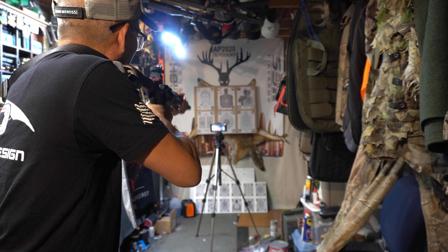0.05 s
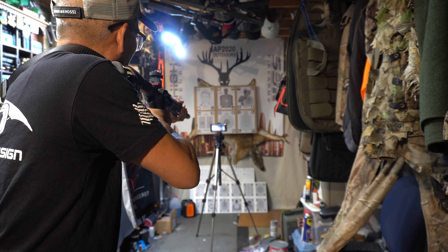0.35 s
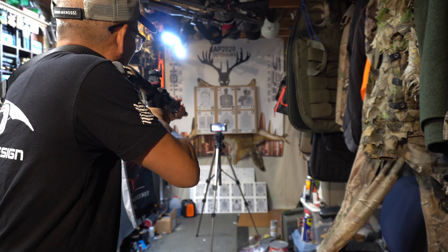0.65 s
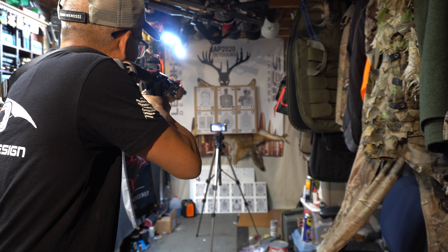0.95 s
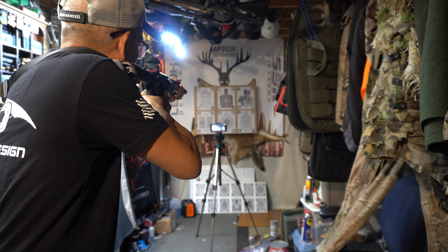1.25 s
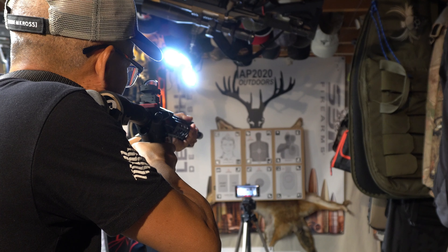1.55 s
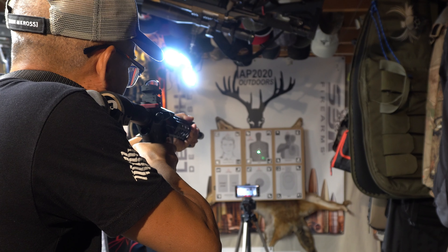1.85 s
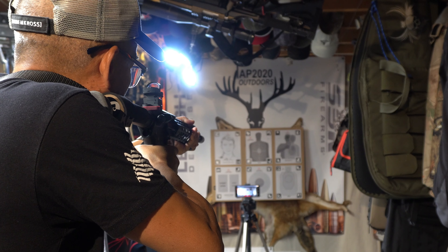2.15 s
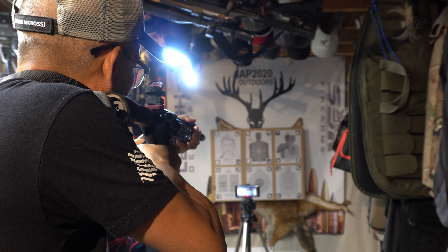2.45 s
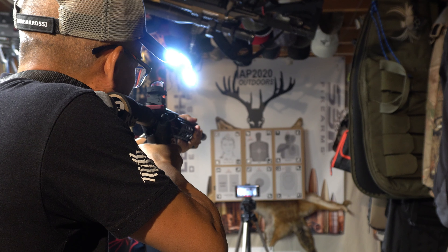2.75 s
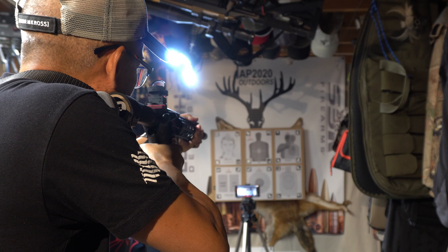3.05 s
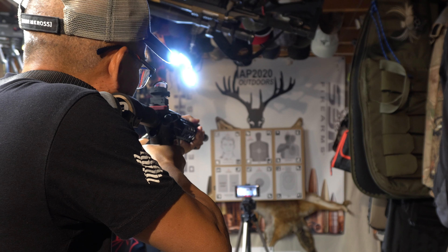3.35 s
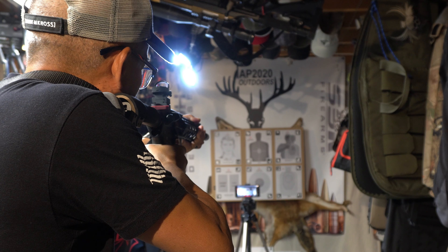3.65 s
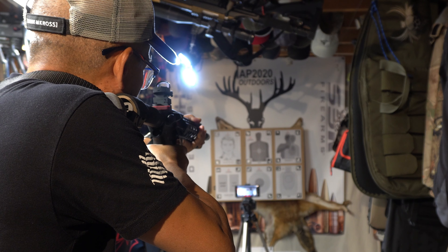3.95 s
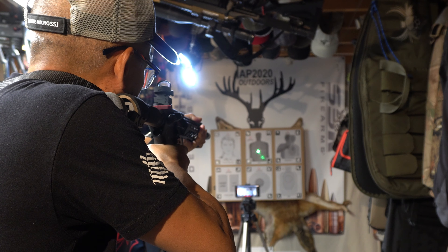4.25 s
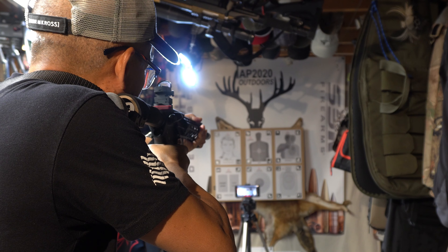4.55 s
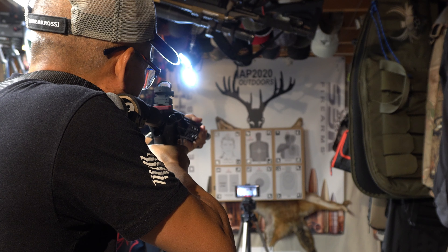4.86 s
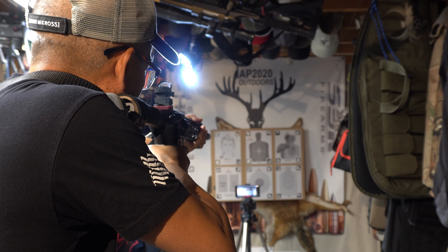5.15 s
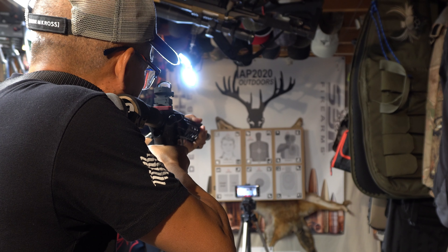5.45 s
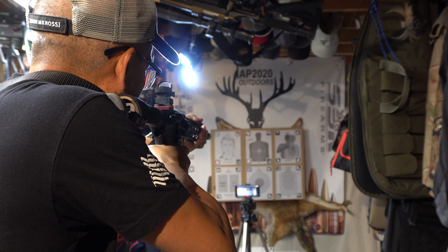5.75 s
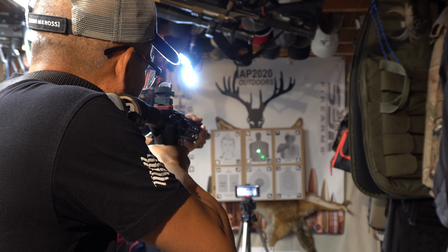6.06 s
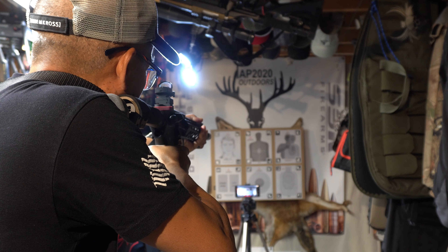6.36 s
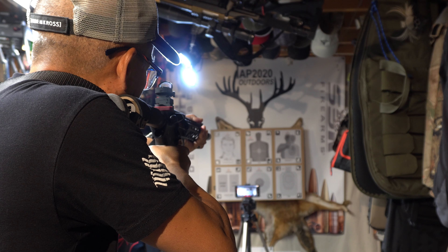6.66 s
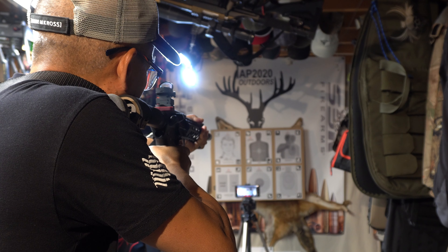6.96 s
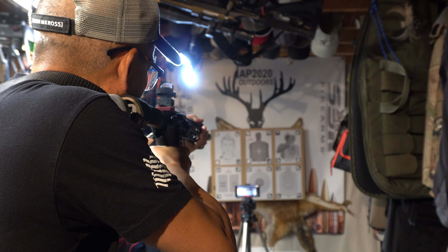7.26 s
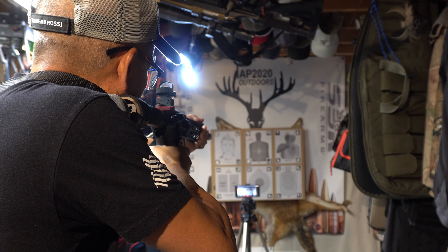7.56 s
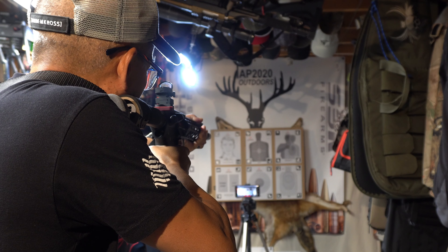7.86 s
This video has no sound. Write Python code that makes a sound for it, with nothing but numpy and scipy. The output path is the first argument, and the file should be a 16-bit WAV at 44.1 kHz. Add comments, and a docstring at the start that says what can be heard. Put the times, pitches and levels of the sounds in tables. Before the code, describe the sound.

Ten close, steely trigger clicks from an unloaded rifle speed up in a small room, each trailed by a brief whir and snaps.

```python
"""A low rumble and faint handling, then ten dry-fire pulls of a rifle in a cluttered basement.
Each pull drops the hammer; a small geared motor whirs, snaps it back over a catch and the sear,
and hits its stop. Every blow is a burst of steel contact that rings the receiver.
Springs and room sing on faintly. The pulls come faster and the rumble grows."""
import sys
import numpy as np
from scipy import signal
from scipy.fft import rfft, irfft
from scipy.io import wavfile
from scipy.ndimage import uniform_filter1d

SR = 44100
rng = np.random.default_rng(int(sys.argv[2]) if len(sys.argv) > 2 else 0)


def generate_wav(sig):
    """Save sig (samples, or channels by samples) to the path in sys.argv[1] as 16-bit PCM at SR."""
    pcm = np.round(np.clip(np.atleast_2d(sig).T, -1, 1) * 32767).astype(np.int16)
    wavfile.write(sys.argv[1], SR, pcm)


N = 357474
TIME_S = np.arange(N) / SR
SIDE_SIGN = np.array([[1], [-1]])

# Background spectra. Each row: frequency in Hz, relative level in dB.
RUMBLE_TONE = [(15, -1.5), (30, 0), (55, -1), (90, -7.5), (150, -17.5), (300, -24), (700, -32.5),
               (2000, -46), (16000, -77.5)]
HISS_TONE = [(50, 2), (400, 8), (1000, -0.5), (2500, -2), (6000, -2), (10000, 0.5), (16000, 1)]
# Background envelopes. Each row: time in seconds, level in dB.
RUMBLE_LEVEL = [(0, -58), (2.1, -55.5), (3.6, -56.5), (4.3, -50.5), (8.11, -52)]
HISS_LEVEL = [(0, -70.5), (4, -66), (8.11, -65.5)]
# Hand bumps. Each row: start in seconds, relative level in dB, hardness in dB, decay in seconds.
BUMPS = [(0.048, -38, -16, 0.0067), (0.731, -33.5, -20, 0.0093), (0.846, -28, -8.5, 0.013),
         (1.726, -46, -10, 0.018), (2.622, -40, -35, 0.093), (7.273, -33.5, -24, 0.02),
         (7.913, -35.5, -34, 0.027)]
# Sleeve rubs. Each row: peak time in seconds, level in dB, rise and fall in seconds, brightness in dB.
SLEEVE_RUBS = [(.18, -65.5, 0.074, 0.033, 3), (.79, -57, 0.05, 0.068, 2), (4.62, -56, 0.2, .12, -10),
               (7.3, -51, 0.23, 0.44, -27.5), (8.1, -52.5, 0.09, 0.079, -25)]
# Grip and trigger ticks. Each row: start in seconds, relative level in dB, pitch in Hz,
# rise in seconds, pitch prominence in dB.
TICKS = [(0.798, -50, 2120, 0.0025, 3), (0.984, -56, 2270, 0.011, 12), (1, -61, 4030, 0.0051, 16),
         (2.672, -62, 3900, 0.0091, 7), (2.869, -64.5, 3340, .006, 0), (3.025, -63.5, 3700, .008, 5.5),
         (3.144, -64.5, 3740, 0.0076, 6), (4.019, -57.5, 3860, 0.0062, 5.5)]
# Trigger pulls. Each row: hammer fall in seconds, its level in dB, delays to sear and to stop
# in seconds, catch level in dB, catch brightness in dB.
PULLS = [(1.8253, -6.3, .085, .1402, -24.5, -1.5), (3.2129, -4, .0937, .1263, -11.5, -3.5),
         (4.257, -3.3, .0867, .1111, -14.5, -3.5), (4.9222, -3, .0876, .1992, -15, -5.5),
         (5.561, -3.3, .0997, .1585, -8.5, 0), (6.0769, -3, .0895, .1265, -10, -2),
         (6.4426, -5.5, .0925, .129, -12, -2.5), (6.837, -4, .0868, .1334, -9, 6),
         (7.3708, -4.5, .0896, .1338, -7, 1), (7.6685, -4.5, .0828, .1388, -10.5, 2)]
# Source spectra. Each row: frequency in Hz, relative level in dB.
BUMP_TONE = [(30, -1.5), (90, -2), (170, -2), (280, 1.5), (500, -20.5), (1500, -20), (3000, -36.5),
             (15000, -43.5)]
SLEEVE_TONE = [(100, 9.5), (500, 4.5), (1400, 0), (2500, -9.5), (4200, -12.5), (6000, -8.5), (8000, -16.5),
               (10500, -16.5), (11500, -14.5), (12500, -13.5), (13500, -19), (16000, -21)]
HAMMER_TONE = [(60, -5.5), (170, -14.5), (500, -15.5), (800, -11.5), (1300, -0.5), (2000, -6), (2800, -5),
               (5000, -10), (6500, -7), (8200, -15.5), (11000, -7.5), (13500, -12), (16000, -22)]
GEAR_TONE = [(40, -4), (90, 1.5), (180, -19.5), (500, -9.5), (1000, -3), (1500, 5), (2500, -8), (4500, -14),
             (9500, -9), (12000, -15.5), (16000, -20)]
CATCH_TONE = [(60, -0.5), (170, -19.5), (500, -15.5), (800, -5.5), (1300, -9), (2000, -2.5), (2800, 0),
              (5000, -12), (6500, -1), (8200, -2.5), (11000, -7.5), (13500, -10.5), (16000, -13.5)]
SEAR_TONE = [(60, -3.5), (170, -23.5), (500, -5), (800, -12.5), (1300, 1.5), (2000, 2.5), (2800, 2.3),
             (5000, -13.5), (6500, -3.5), (8200, -1), (11000, -9.5), (13500, -4), (16000, -11.5)]
STOP_TONE = [(60, -5), (170, -22.5), (500, -13), (800, -10), (1300, -1), (2000, -1), (2800, 1.5),
             (5000, -6), (6500, -3), (8200, -5.5), (11000, -7.5), (13500, -9.5), (16000, -18.5)]
SPRING_WASH_TONE = [(100, -2.5), (500, -0.5), (900, 7.5), (1800, -4.5), (3500, -1.5), (5200, -7.5),
                    (7500, -17.5), (10400, -10.5), (11500, -23), (16000, -34)]
ROOM_TONE = [(100, -0.5), (300, -0.5), (900, -3), (1600, -6.5), (3000, -3.5), (5500, 1), (8000, -6),
             (12000, 1.5), (16000, 12)]
# Receiver resonances. Each row: frequency in Hz, width in Hz, boost in dB.
RECEIVER_PEAKS = [(272, 130, 10), (707, 234, 10.5), (934, 61, 4.5), (1121, 140, 5), (1250, 200, 6),
                  (1400, 240, 1), (1726, 100, 5), (2175, 150, 3), (2612, 280, 6), (3165, 41, 5),
                  (3760, 400, 3.5), (4540, 300, 4.5), (5570, 600, 0.5), (7616, 1200, 10), (8520, 520, 10),
                  (9470, 460, 5), (10200, 540, 6), (12400, 810, 1.5)]
# Ringing parts. Each row: frequency in Hz, relative level in dB, T60 in seconds.
STEEL_MODES = [(1260, -5, 0.069), (1487, 0, 0.22), (1676, 1.5, 0.17), (2150, -7, 0.25), (2570, -2, 0.15),
               (2580, -4, 0.06), (3020, -1.5, 0.071), (3080, -3, 0.13), (3260, -3.5, 0.2),
               (3900, -1.5, 0.11), (4500, -5.5, 0.083), (5070, -4, 0.16), (7700, 1, 0.052),
               (9150, -1, 0.057), (8360, -0.5, 0.05), (9808, -6, .1)]
SPRING_MODES = [(764, -2.5, 0.59), (748, -2.5, 0.23), (785, -13, 0.34), (1230, -8.5, 0.66),
                (1470, -16.5, 1), (2100, -16, 0.82), (2640, -29.5, 0.46), (3430, -16, 0.74),
                (3320, -12, 0.55), (3480, -18, 0.6), (4000, -12.5, 0.33), (10250, -22.5, .28),
                (10480, -17, 0.24), (11000, -22, 0.38)]
# Gear whine. Each row: time after the hammer in seconds, pitch in Hz.
WHINE_PITCH = [(0, 5635), (.02, 7890), (.036, 9270), (.053, 9380), (.075, 9000), (.14, 8326)]
# Gears taking load. Each row: time before the sear in seconds, relative level in dB.
GEAR_KNOCKS = [(.0582, -20), (.0354, -21.5)]
# Gear slips. Each row: time in seconds, relative level in dB, brightness in dB.
GEAR_SLIPS = [(5.0114, -8.5, -1.5), (5.095, -7.5, -1.5)]
# Room decay. Each row: frequency in Hz, T60 in seconds.
ROOM_T60 = [(100, 0.043), (800, 0.28), (2000, 0.26), (5000, 0.27), (9000, 0.21), (16000, .13)]
# Stereo width of room and microphone ports. Each row: frequency in Hz, side over mid in dB.
ROOM_SIDE = [(40, -12), (150, 0), (400, -1.5), (1200, 6), (3000, 1.5), (7000, -0.5), (11000, -3),
             (16000, -14)]
PORT_SIDE = [(50, -16.5), (150, -7), (350, -15), (700, -18), (1300, -18), (2800, -21.5), (5500, -22),
             (10000, -22), (16000, -17)]


def amp(db):
    """Decibels to gain."""
    return 10 ** (np.asarray(db) / 20)


def unit(x):
    """Scale to rms 1."""
    return x / np.sqrt(np.mean(x ** 2) + 1e-20)


def curve_at(points, hz):
    """Interpolate over log frequency."""
    point_hz, value = np.transpose(points)
    return np.interp(np.log(hz + 1), np.log(point_hz + 1), value)


def add(mix, start_s, sound):
    """Mix a sound in place."""
    part = mix[..., max(round(start_s * SR), 0):][..., :sound.shape[-1]]
    part += sound[..., :part.shape[-1]]


def noise(tone, size=N):
    """Coloured noise, rms 1."""
    gain = amp(curve_at(tone, np.fft.rfftfreq(size, 1 / SR)))
    return unit(irfft(rfft(rng.standard_normal(size)) * gain, size))


def stereo_noise(tone, side):
    """Mid noise plus independent side noise."""
    return noise(tone) + side * noise(tone) * SIDE_SIGN


def background():
    """Rumble and hiss, louder in the second half."""
    rumble_db = np.interp(TIME_S, *np.transpose(RUMBLE_LEVEL))
    hiss_db = np.interp(TIME_S, *np.transpose(HISS_LEVEL))
    rumble = amp(rumble_db) * stereo_noise(RUMBLE_TONE, side=.08)
    return rumble + amp(hiss_db) * stereo_noise(HISS_TONE, side=.25)


def bumps(gain_db=-4, hard_above_hz=150, rise_s=.00023):
    """Hands bump the stock; hard bumps reach higher."""
    out, t = np.zeros(N), np.arange(8192) / SR
    for start_s, db, hard_db, decay_s in BUMPS:
        tone = [(hz, tone_db + hard_db * (hz > hard_above_hz)) for hz, tone_db in BUMP_TONE]
        envelope = np.exp(-t / decay_s) * (1 - np.exp(-t / rise_s))
        add(out, start_s, amp(db + gain_db) * noise(tone, len(t)) * envelope)
    return out


def sleeve(cloth_hz=600):
    """A sleeve rubs the stock in swells; slow rubs have little above cloth_hz."""
    out = np.zeros(N)
    for peak_s, db, rise_s, fall_s, bright_db in SLEEVE_RUBS:
        tone = [(hz, tone_db + bright_db * (hz > cloth_hz)) for hz, tone_db in SLEEVE_TONE]
        width_s = np.where(TIME_S < peak_s, rise_s, fall_s)
        out += amp(db) * noise(tone) * np.exp(-((TIME_S - peak_s) / width_s) ** 2)
    return out


def grip_ticks(gain_db=-5):
    """Grip and trigger slack tick as the shooter settles."""
    out, t = np.zeros(N), np.arange(8192) / SR
    for start_s, db, hz, rise_s, peak_db in TICKS:
        tone = [(hz / 4, -16), (hz * .85, 0), (hz, peak_db), (hz * 1.15, 0), (hz * 2.6, -18)]
        envelope = t / rise_s * np.exp(1 - t / rise_s)
        add(out, start_s, amp(db + gain_db) * noise(tone, len(t)) * envelope)
    return out


def contact(rise_s, fall_s, chatter_db, chatter_s, crisp_s=.0025, soft_hz=7000, size=1024):
    """Steel on steel: a burst builds, collapses and chatters; only its peak keeps the top treble."""
    t = (np.arange(size) - size // 4) / SR
    decay = np.exp(-abs(t) / fall_s) + amp(chatter_db) * np.exp(-abs(t) / chatter_s)
    envelope = np.where(t < 0, np.exp(-abs(t) / rise_s), decay)
    burst = rng.standard_normal(size) * envelope
    for _ in range(2):  # hard contact: near-flat spectrum
        flat = irfft(np.exp(1j * np.angle(rfft(burst))))
        burst = envelope * np.tanh(unit(flat) / (unit(envelope) + 1e-9))
    hz = np.fft.rfftfreq(size, 1 / SR)
    soft = irfft(rfft(burst) / np.sqrt(1 + (hz / soft_hz) ** 2))
    return soft + (burst - soft) * np.exp(-(t / crisp_s) ** 2)


def receiver(tone, bright_db, pivot_hz=3500, vary_db=3, size=4096):
    """Minimum-phase ring of the receiver; each blow favours other resonances."""
    hz = np.fft.rfftfreq(size, 1 / SR)
    db = curve_at(tone, hz) + bright_db * np.tanh(np.log((hz + 1) / pivot_hz))
    for peak_hz, width_hz, boost_db in RECEIVER_PEAKS:
        db += (boost_db + vary_db * rng.standard_normal()) / (1 + (2 * (hz - peak_hz) / width_hz) ** 2)
    log_gain = np.log(amp(np.r_[db, db[-2:0:-1]]))
    return np.fft.ifft(np.exp(np.conj(signal.hilbert(log_gain)))).real


def blows(hits, tone, gain_db, lead_s, **contact_shape):
    """Contacts ring the receiver. Each hit: time in seconds, relative level and brightness in dB."""
    out = np.zeros(N)
    for hit_s, db, bright_db in hits:
        burst = contact(**contact_shape)
        click = signal.fftconvolve(burst, receiver(tone, bright_db))
        click *= np.sqrt(.002 * SR / np.sum(click ** 2))  # energy of 2 ms at rms 1
        peak_s = len(burst) // 4 / SR
        add(out, hit_s - peak_s - lead_s, amp(db + gain_db) * click)
    return out


def hammer():
    """The hammer strikes once per pull."""
    falls = [(pull_s, db, 0) for pull_s, db, *_ in PULLS]
    return blows(falls, HAMMER_TONE, gain_db=0, lead_s=.0006,
                 rise_s=.0009, fall_s=.002, chatter_db=-22, chatter_s=.005)


def stock_thump(gain_db=-21, hollow_hz=275, rise_s=.00062, fall_s=.0017):
    """The hammer kicks the hollow stock: one heavily damped low mode."""
    out, t = np.zeros(N), np.arange(2048) / SR
    envelope = np.exp(-t / fall_s) * (1 - np.exp(-t / rise_s))
    for pull_s, db, *_ in PULLS:
        hz = hollow_hz * (1 + .069 * rng.standard_normal())
        add(out, pull_s - .001, amp(db + gain_db) * np.sin(2 * np.pi * hz * t) * envelope)
    return out


def steel_ring(drive, gain_db=-27):
    """Barrel, spring and pins ring briefly in narrow modes."""
    t = np.arange(SR // 3) / SR
    ring = sum(amp(db - 60 * t / t60_s) * np.sin(2 * np.pi * hz * t) for hz, db, t60_s in STEEL_MODES)
    return amp(gain_db) * signal.oaconvolve(drive, ring / np.linalg.norm(ring))[:N]


def motor(rasp_db=-30, whine_db=-38, slow_gear_db=-41, tooth_db=2, grit_db=3, fade_db_per_s=25):
    """From hammer to stop the gears rasp, pulsing per tooth; their whine climbs, then sags under load."""
    out = np.zeros(N)
    for pull_s, _, _, to_stop_s, *_ in PULLS:
        t = np.arange(0, to_stop_s, 1 / SR)
        hz = np.interp(t, *np.transpose(WHINE_PITCH)) * (1 + .008 * rng.standard_normal())
        jitter = 1 + .04 * rng.standard_normal(len(t))
        phase = 2 * np.pi * np.cumsum(hz * jitter) / SR
        uneven_bite = unit(uniform_filter1d(rng.standard_normal(len(t)), size=60))
        bite_db = tooth_db * np.sin(phase / 36) + grit_db * uneven_bite
        rasp = unit(noise(GEAR_TONE, len(t)) * amp(bite_db))
        whine = amp(whine_db) * np.sin(phase) + amp(slow_gear_db) * np.sin(phase / 4.4)
        envelope = amp(-fade_db_per_s * t) * signal.windows.tukey(len(t), .08)
        add(out, pull_s, (amp(rasp_db) * rasp + whine) * envelope)
    return out


def gear_knocks():
    """The gears knock twice as they take the load; in one reset they also slip and snap."""
    knocks = [(pull_s + to_sear_s - early_s, db, 0)
              for pull_s, _, to_sear_s, *_ in PULLS for early_s, db in GEAR_KNOCKS]
    return blows(knocks + GEAR_SLIPS, STOP_TONE, gain_db=-2.5, lead_s=.0002,
                 rise_s=.00035, fall_s=.00096, chatter_db=-8, chatter_s=.002)


def reset_snaps(catch_lead_s=.0176, sear_bright_db=1.3, stop_bright_db=-2.7):
    """The hammer snaps over catch and sear, the lever hits its stop; the last two rebound once."""
    catches, sears, stops = [], [], []
    for pull_s, _, to_sear_s, to_stop_s, catch_db, catch_bright_db in PULLS:
        catches.append((pull_s + to_sear_s - catch_lead_s, catch_db, catch_bright_db))
        sears.append((pull_s + to_sear_s, 0, sear_bright_db))  # spring-driven: same force every pull
        stops.append((pull_s + to_stop_s, 0, stop_bright_db))
    sear_rebounds = np.add(sears, [.0125, 0, 0])
    stop_rebounds = np.add(stops, [.0036, 0, -1])
    out = blows(catches, CATCH_TONE, gain_db=0, lead_s=.0002,
                rise_s=.0004, fall_s=.0008, chatter_db=-20, chatter_s=.002)
    out += blows(sears, SEAR_TONE, gain_db=-8.2, lead_s=.0003,
                 rise_s=.00025, fall_s=.0009, chatter_db=-24, chatter_s=.002)
    out += blows(stops, STOP_TONE, gain_db=-5.4, lead_s=.0005,
                 rise_s=.00071, fall_s=.0016, chatter_db=-20.5, chatter_s=.0026)
    out += blows(sear_rebounds, STOP_TONE, gain_db=-23, lead_s=.00012,
                 rise_s=.00013, fall_s=.0038, chatter_db=-25, chatter_s=.0047)
    out += blows(stop_rebounds, STOP_TONE, gain_db=-12.9, lead_s=.0002,
                 rise_s=.000096, fall_s=.0009, chatter_db=-20, chatter_s=.004)
    return out


def springs(delay_s=.272, swell_s=.043, gain_db=-48, wash_db=-2, wash_t60_s=.91, waver_hz=14, waver_db=4):
    """A faint metallic ring over a noise wash swells after each cycle; its modes waver as they die."""
    out, wash_power = np.zeros((2, N)), np.zeros(N)
    t = np.arange(-SR // 4, SR) / SR
    swell = amp(gain_db) * np.exp(-(np.minimum(t, 0) / swell_s) ** 2)
    age_s = np.maximum(t, 0)
    waver_steps = (t - t[0]) * waver_hz
    for pull_s, *_ in PULLS:
        start_s = pull_s + delay_s + t[0]
        for hz, db, t60_s in SPRING_MODES:
            drift_rad = np.interp(waver_steps, np.arange(64), rng.standard_normal(64))
            drift_db = waver_db * np.interp(waver_steps, np.arange(64), rng.standard_normal(64))
            phase = 2 * np.pi * (hz * t + rng.random()) + drift_rad + .5 * rng.standard_normal((2, 1))
            add(out, start_s, amp(db + drift_db - 60 * age_s / t60_s) * swell * np.sin(phase))
        add(wash_power, start_s, (swell * amp(wash_db - 60 * age_s / wash_t60_s)) ** 2)
    return out + np.sqrt(wash_power) * stereo_noise(SPRING_WASH_TONE, side=.43)


def room(source, wet_db=-4.5, onset_s=.0051):
    """Dense reflections from near walls and clutter; each band has its own decay."""
    hz, t, bands = signal.stft(rng.standard_normal((2, SR // 2)), SR, nperseg=256)
    bands *= amp(curve_at(ROOM_TONE, hz)[:, None] - 60 * t / curve_at(ROOM_T60, hz)[:, None])
    bands[1] *= amp(curve_at(ROOM_SIDE, hz))[:, None]
    tail = signal.istft(bands, SR, nperseg=256)[1]
    tail *= 1 - np.exp(-(np.arange(tail.shape[1]) / SR / onset_s) ** 2)
    mid, side = signal.fftconvolve(source[None], tail / np.linalg.norm(tail[0]), axes=1)[:, :N]
    return amp(wet_db) * (mid + side * SIDE_SIGN)


def mic_ports(source, scatter_s=.0006, left_db=.23, size=1024):
    """Scatter off the shoulder reaches two microphone ports with different phases."""
    scatter = rfft(rng.standard_normal(size) * np.exp(-np.arange(size) / SR / scatter_s))
    quarter_turn = 1j * np.tanh(3 * np.sin(np.angle(scatter)))  # keeps both ports equally loud
    side_gain = amp(curve_at(PORT_SIDE, np.fft.rfftfreq(size, 1 / SR)))
    kernel = np.roll(irfft(quarter_turn * side_gain), size // 2)
    side = signal.oaconvolve(source, kernel)[size // 2:][:N]
    return (source + side * SIDE_SIGN) * amp(left_db * SIDE_SIGN)


def scene():
    """The close rifle in its room over rumble and hiss."""
    action = hammer() + reset_snaps() + gear_knocks() + motor()
    rifle = action + steel_ring(action) + stock_thump() + grip_ticks() + sleeve()
    return background() + mic_ports(rifle + bumps()) + room(rifle) + springs()


def record(dry, ceiling=.9, cutoff_hz=16000):
    """Soft clip, then low-pass."""
    rounded = dry / (1 + (dry / ceiling) ** 4) ** (1 / 4)
    lowpass = signal.firwin(255, cutoff_hz, window=("kaiser", 8), fs=SR)
    return signal.oaconvolve(rounded, lowpass[None], "same")


dry = scene()
out = record(dry)
generate_wav(out)
```